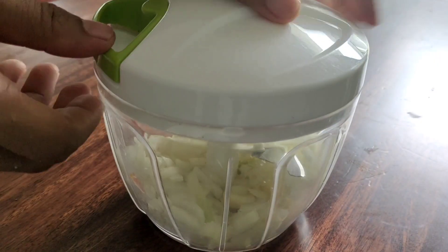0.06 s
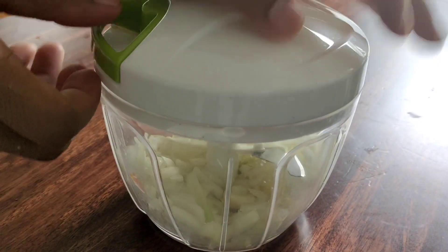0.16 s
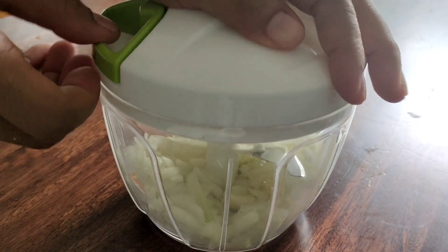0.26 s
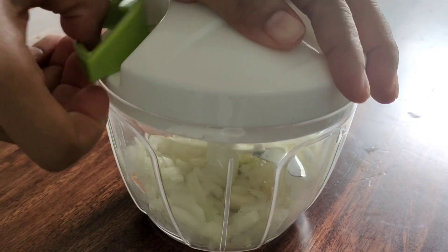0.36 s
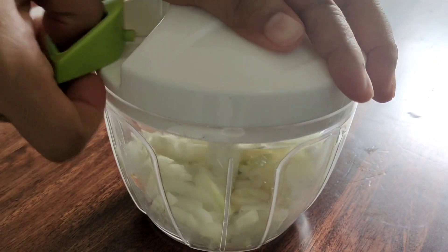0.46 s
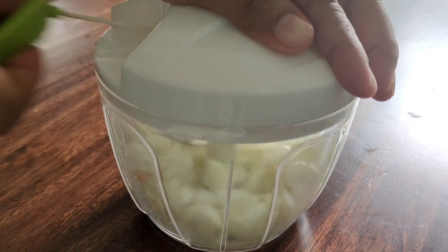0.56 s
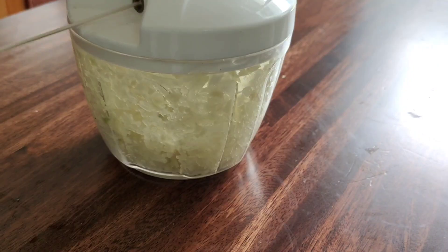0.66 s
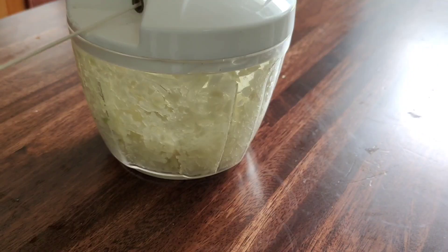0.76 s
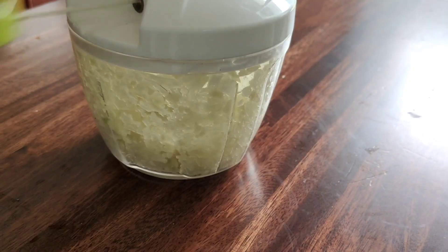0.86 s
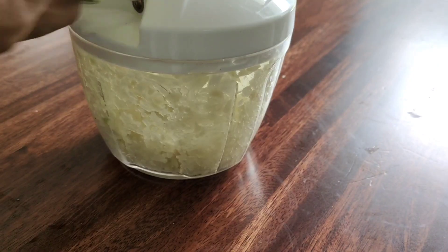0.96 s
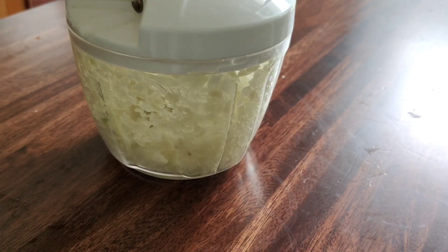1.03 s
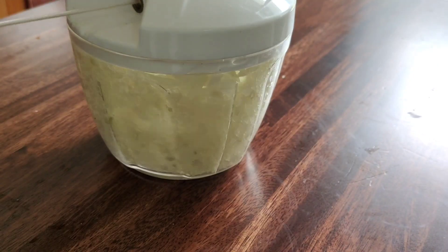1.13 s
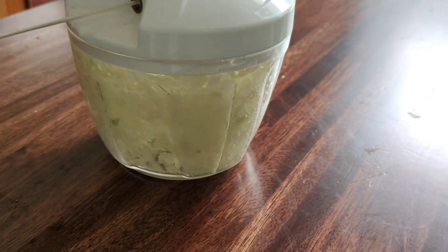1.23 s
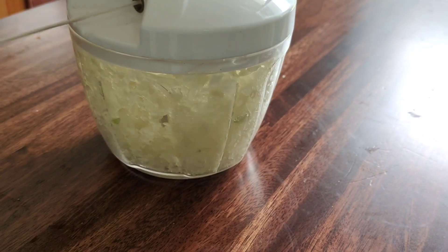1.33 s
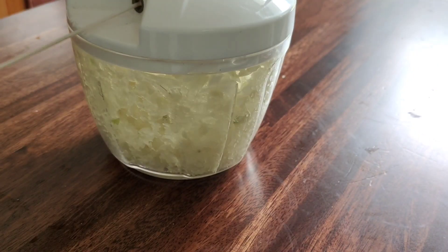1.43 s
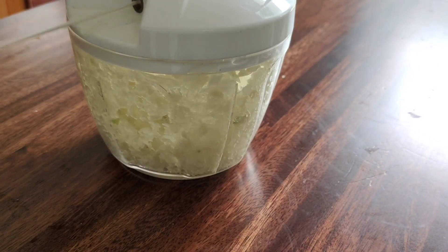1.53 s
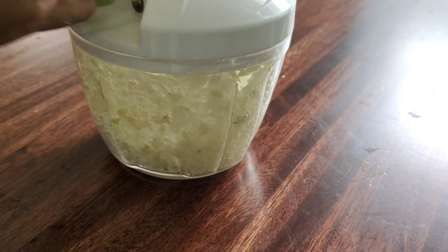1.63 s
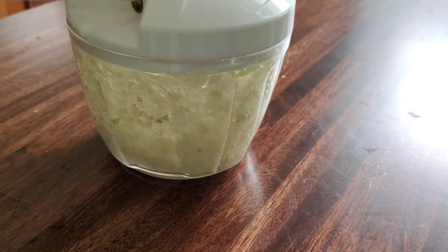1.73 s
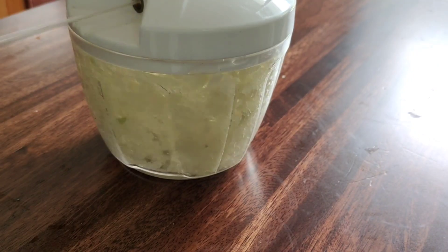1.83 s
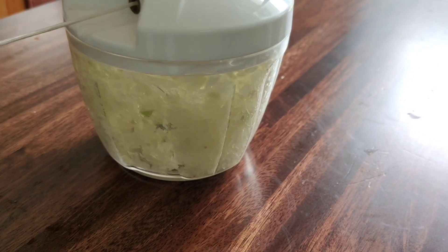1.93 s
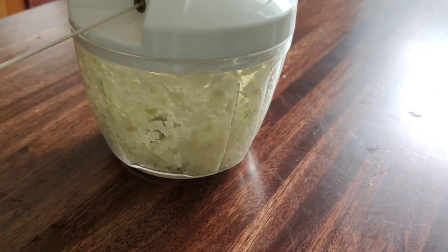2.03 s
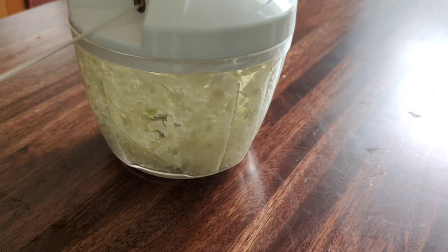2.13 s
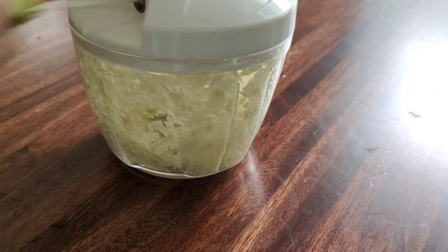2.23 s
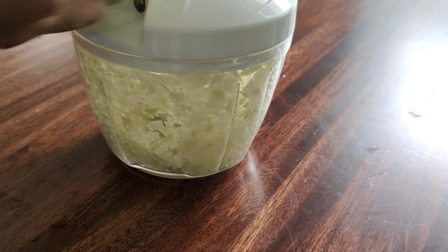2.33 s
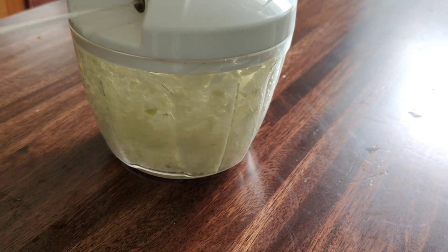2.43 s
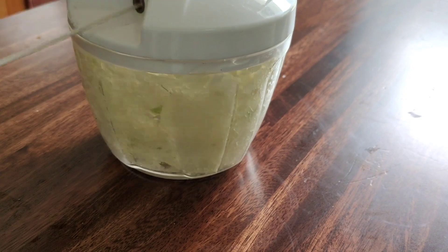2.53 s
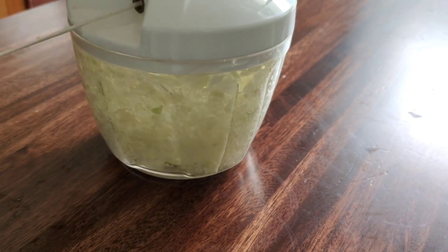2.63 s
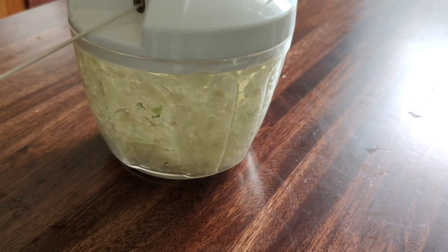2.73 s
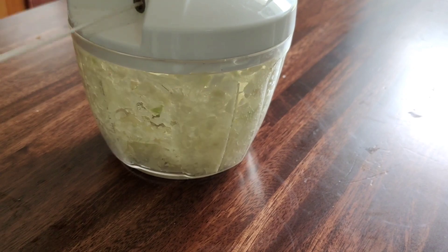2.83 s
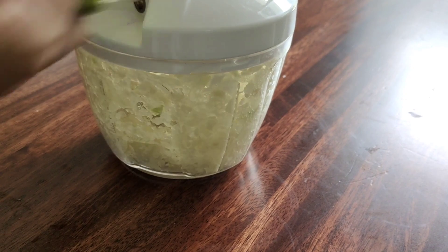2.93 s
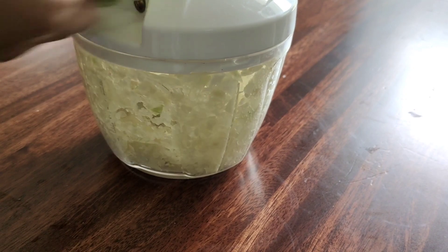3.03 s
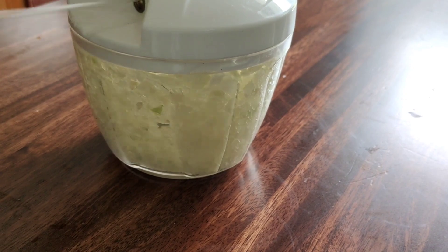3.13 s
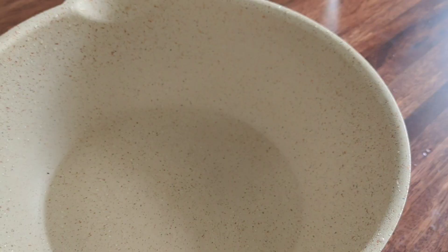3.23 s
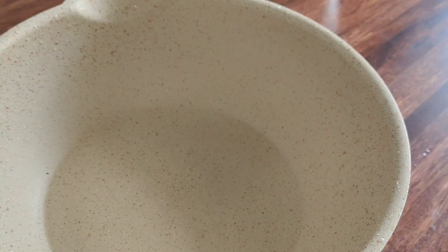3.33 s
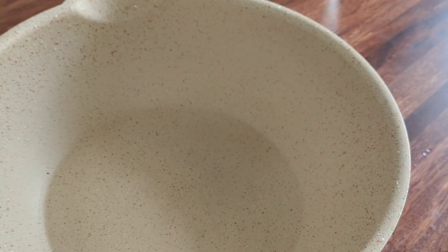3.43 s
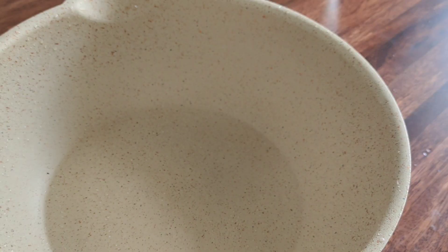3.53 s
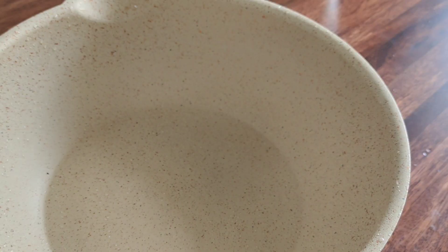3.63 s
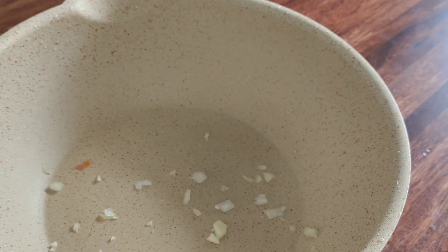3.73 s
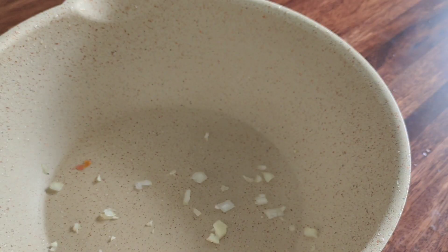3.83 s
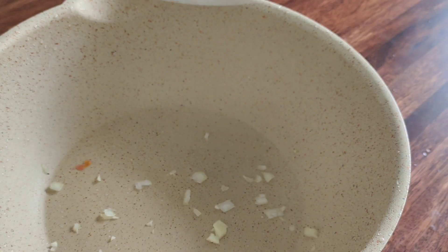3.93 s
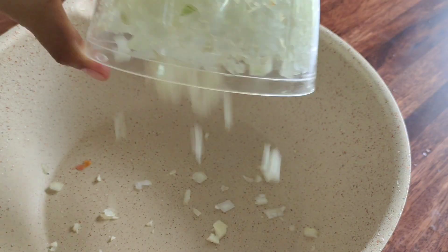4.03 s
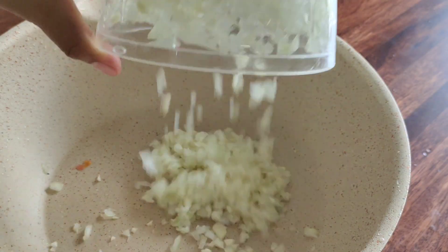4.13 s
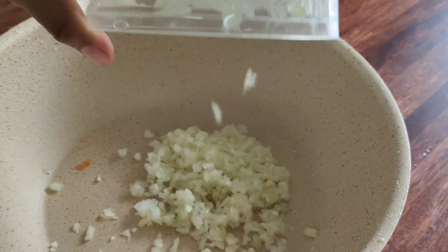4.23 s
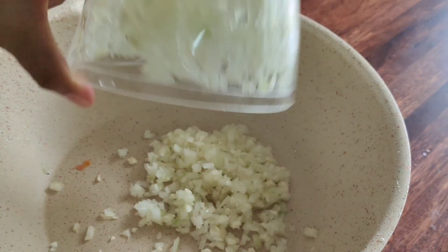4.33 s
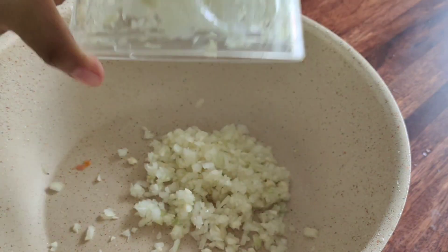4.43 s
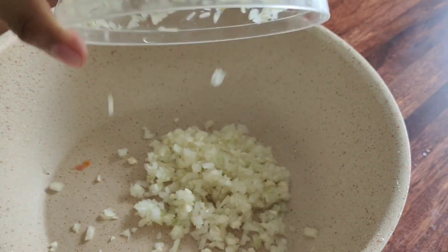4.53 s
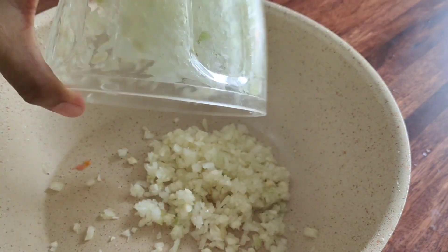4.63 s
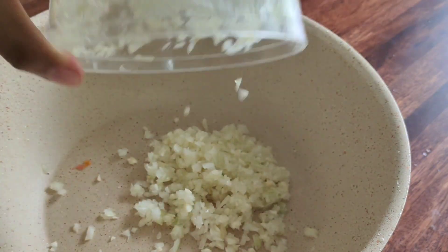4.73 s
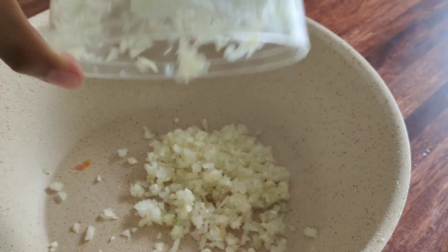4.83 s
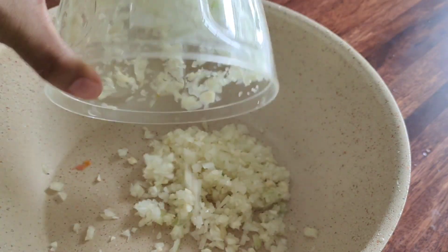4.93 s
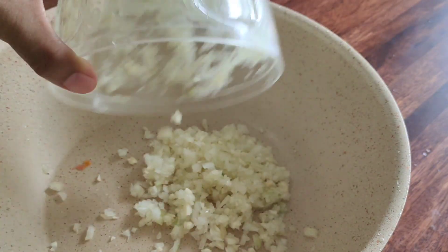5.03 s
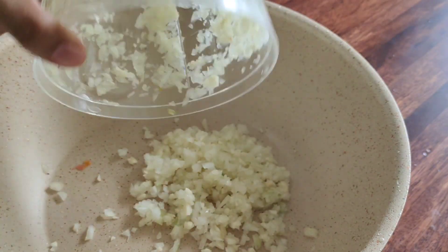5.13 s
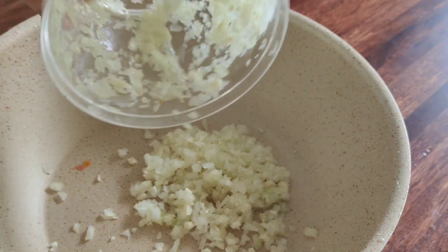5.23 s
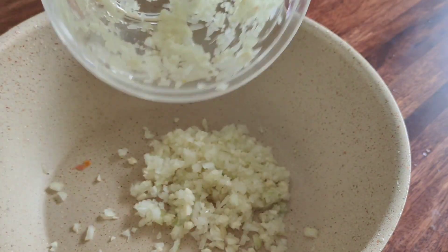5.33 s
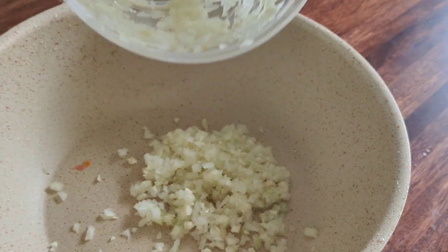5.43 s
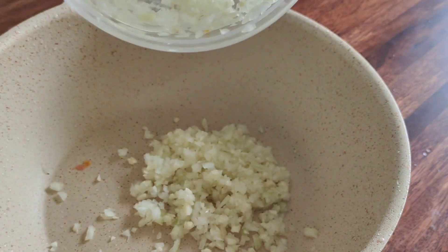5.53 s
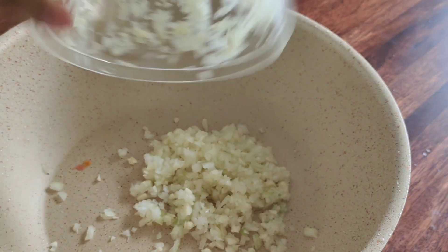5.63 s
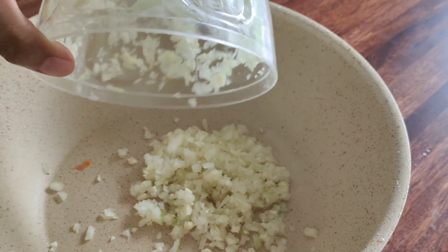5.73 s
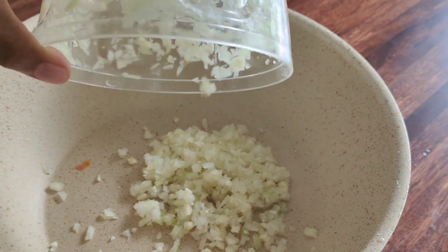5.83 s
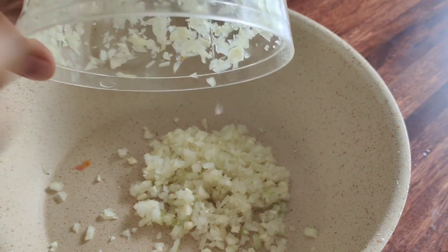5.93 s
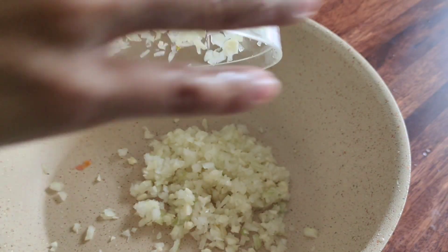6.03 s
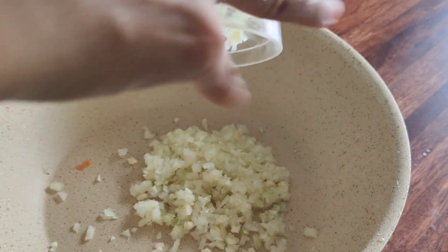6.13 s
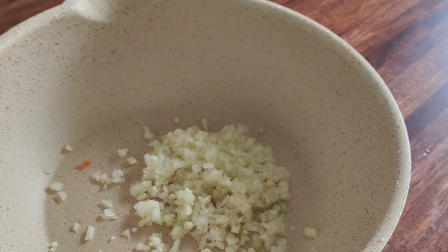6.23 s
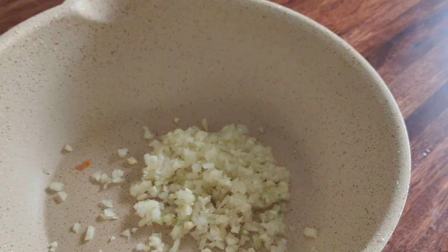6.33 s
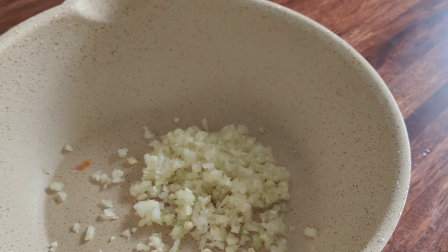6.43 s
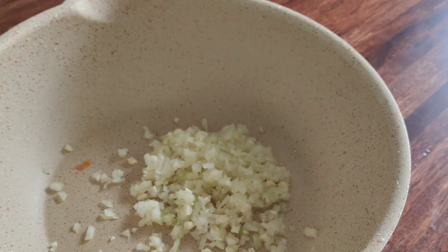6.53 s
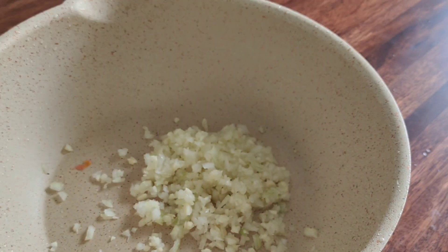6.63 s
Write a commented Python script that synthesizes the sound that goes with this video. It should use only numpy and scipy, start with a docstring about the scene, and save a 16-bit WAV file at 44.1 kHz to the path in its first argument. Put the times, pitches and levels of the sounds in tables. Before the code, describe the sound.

A close stereo pickup in a small, lightly echoing room with faint air noise and a low appliance hum. Slight rubbing of hands and small clicks lead to the first chopper pull at about 0.6 s: a loud, clumpy clatter of onion hitting plastic with hard hollow knocks. More pulls follow near 1.1, 1.8, 2.45 and 3.2 s, each dying into a dry rasping spring whirr of very fine ticks, strongest after the middle three, with snaps around 1.04, 1.66, 2.33 and 3.05 s. The last pull adds a low wavering judder against the table from 2.9 s. Everything cuts short near 3.46 s. A sharp rap at 3.6 s and crumbs pattering until 3.85 s follow, then a softer spill at 4.1 s. Dull pats and scuffs come near 4.5, 6.0 and 6.4 s, with sparse faint taps between. At 6.1 s the pan gives one hard tick and brief ring.

```python
"""Pull-cord onion chopper

Five pulls throw onion against the blades and the plastic tub on a wooden table in a small room: clumped grains
through tub resonances. After each, the spring reels the cord in with a rasping whirr of very fine ticks.
The chopping is cut short, then the tub is knocked and patted empty over a coated pan, which it touches once:
noise bursts through short rings, dull decaying booms and a bank of dying sines. Air noise and a hum lie behind."""
import sys
import numpy as np
from scipy import signal
from scipy.fft import rfft, irfft
from scipy.io import wavfile
from scipy.ndimage import uniform_filter1d

SR = 44100
rng = np.random.default_rng(int(sys.argv[2]) if len(sys.argv) > 2 else 0)


def to_wav(s):
    """Save 16-bit WAV."""
    ch = np.atleast_2d(s).T  # columns
    pcm = np.round(np.clip(ch, -1, 1) * 32767)  # PCM
    wavfile.write(sys.argv[1], SR, pcm.astype(np.int16))


N = 294588
T = np.arange(N) / SR


def from_db(db):
    """Decibels to gain."""
    return 10 ** (np.asarray(db) / 20)


def at_hz(points, hz):
    """Read a curve on a log-frequency axis."""
    f, value = np.transpose(points)
    return np.interp(np.log(np.maximum(hz, 1)), np.log(f), value)


def convolve(x, response):
    """Causal convolution of every channel."""
    full = signal.fftconvolve(np.atleast_2d(x), np.atleast_2d(response), axes=-1)
    return full[:, :np.shape(x)[-1]]


def colour(x, points, tilt_db=0, size=4096):
    """Minimum-phase EQ through the points, tilted per octave about 1.5 kHz (the tilt is flat below 300 Hz)."""
    hz = np.maximum(np.fft.rfftfreq(size, 1 / SR), 10)
    level_db = at_hz(points, hz) + tilt_db * np.log2(np.maximum(hz, 300) / 1500)
    cepstrum = irfft(np.log(from_db(level_db)))
    # folding the cepstrum on to positive time makes the filter minimum-phase
    cepstrum[1:size // 2] *= 2
    cepstrum[size // 2 + 1:] = 0
    return convolve(x, irfft(np.exp(rfft(cepstrum))))


def resonate(x, modes):
    """Parallel resonances, each (f/Hz, width/Hz, level/dB)."""
    out = 0
    for hz, width_hz, db in modes:
        b, a = signal.iirpeak(hz, hz / width_hz, SR)
        out = out + from_db(db) * signal.lfilter(b, a, x + 1e-18)
    return out


def band_pass(x, band_hz):
    """Second-order Butterworth band-pass."""
    return signal.sosfilt(signal.butter(2, band_hz, "band", fs=SR, output="sos"), x)


def unit_in(x, band_hz):
    """Scale to rms 1 within a band."""
    return x / np.sqrt(np.mean(band_pass(x, band_hz) ** 2))


def grains(per_s, spread_db):
    """Random tiny impacts of uneven size; rms 1."""
    sizes = from_db(spread_db * np.minimum(rng.exponential(1, N), 4)) * rng.choice([-1, 1], N)
    clicks = sizes * (rng.random(N) < per_s / SR)
    return clicks / np.std(clicks)


def wander(per_s):
    """Straight lines between random knots whose spread is 1."""
    knots = np.arange(0, N / SR + 1, 1 / per_s)
    return np.interp(T, knots, rng.standard_normal(size=4096)[:len(knots)])


def lumps(per_s, depth_db):
    """A gain that swells and sinks at random."""
    return from_db(depth_db * wander(per_s))


def swell(s, hold_s, db, rise_db_per_s, fall_db_per_s):
    """Gain that rises to its level at a time, holds and dies away, all in straight dB ramps."""
    below_db = rise_db_per_s * np.maximum(s - T, 0) + fall_db_per_s * np.maximum(T - s - hold_s, 0)
    return from_db(db - np.minimum(below_db, 200))


def swells(rows):
    """Sum of the swells in a table."""
    return sum(swell(*row) for row in rows)


def rustle(points, per_s, spread_db):
    """Fine grains of rubbing or pattering, rms 1 in the mids."""
    return unit_in(colour(grains(per_s, spread_db), points), (600, 8000))


def add(track, s, sound):
    """Mix a short sound in at a time."""
    start = round(s * SR)
    track[start:start + len(sound)] += sound[:N - start]


def to_peak(x, db):
    """Scale a blow to its peak level."""
    return from_db(db) * np.ravel(x) / np.abs(x).max()


def contact(crush_s, grit, size=4096):
    """One sharp push followed by a short burst of crushing."""
    burst = grit * rng.standard_normal(size) * np.exp(-T[:size] / crush_s)
    burst[0] += 1
    return burst


def blows(rows, points, crush_s, grit, ring_db, damping):
    """Each contact rings briefly at a pitch set by where it lands; damping is ring width over pitch."""
    buildup_s = .0015  # every contact starts this long after its listed time
    out = np.zeros(N)
    for s, peak_db, hz, tilt_db in rows:
        push = contact(crush_s, grit)
        push = push + resonate(push, [(hz, hz * damping, ring_db)])
        add(out, s + buildup_s, to_peak(colour(push, points, tilt_db), peak_db))
    return out


# tone of the room's echoes against the direct sound: (f/Hz, level/dB)
ROOM_ECHO_COLOUR = [(120, -23), (350, -10.5), (1000, -4), (3000, -2), (12000, -5.5)]
ROOM_T60_S = 0.21
RIGHT_LEAD_S = 0.00012


def room(dry, lead_s, echo_db=0, size=22050):
    """Direct sound reaches the right port first; a quick scatter off table and hands follows, then the walls."""
    t = T[:size]
    walls = from_db(-60 * t / ROOM_T60_S) * (1 - np.exp(-t / 0.0092))
    nearby = np.exp(-t / 0.0017) * (t > .0003)
    decay = walls / np.linalg.norm(walls) + from_db(1.0) * nearby / np.linalg.norm(nearby)
    echoes = colour(rng.standard_normal((2, size)) * decay, ROOM_ECHO_COLOUR)
    # windowed sinc: a delay of a fraction of a sample
    lag = np.sinc(np.arange(32) - 8 - lead_s * SR) * signal.windows.tukey(32, .3)
    left = np.convolve(dry, lag)[8:8 + N]
    return np.array([left, dry]) + from_db(echo_db) * convolve(dry, echoes)


# spectrum of the room air: (f/Hz, level/dB per Hz)
AIR_COLOUR = [(15, -77.5), (25, -58), (69, -31), (91, -12), (122, -13.5), (198, -10.5), (267, -14.5),
              (297, -9.5), (368, -15.5), (482, -13), (648, -23.5), (1660, -32), (1950, -31), (3340, -36),
              (15500, -46.5)]
# steady tones of the appliance: (f/Hz, rms level/dB)
APPLIANCE_HUM = [(102.3, -76), (199.2, -71.5), (301.5, -63.5), (484.5, -69), (565.2, -82), (1900, -84),
                 (2239, -85), (2385, -89.5)]
AIR_DB = -67.5


def background():
    """Room air as noise, nearly alike in both ears in the bass, and an appliance's hum as steady sines."""
    mid = rng.standard_normal(N)
    side = colour(rng.standard_normal(N), [(100, -14), (400, -1.0), (1500, 1.5), (8000, 1.0)])
    air = colour(mid + side * [[1], [-1]], AIR_COLOUR)
    hum = 0
    for hz, db in APPLIANCE_HUM:
        hum = hum + np.sqrt(2) * from_db(db) * np.sin(2 * np.pi * (hz * T + rng.random()))
    return from_db(AIR_DB) * unit_in(air, (600, 8000)) + hum


# hands and slack cord rub on the lid: (firmest t/s, hold/s, level/dB, rise/dB per s, fall/dB per s)
HANDLING = [(0.35, 0.25, -56.5, 34, 600)]
# spectrum of the rubbing: (f/Hz, level/dB per Hz)
RUB_COLOUR = [(47, -44), (80, -22.5), (166, 6.5), (350, -10.5), (477, -1), (621, -10), (2040, -18),
              (2720, -18.5), (8930, -27), (15500, -34)]


def rubbing():
    """Skin and cord drag over the lid in a dense run of tiny grains."""
    return swells(HANDLING) * rustle(RUB_COLOUR, per_s=2300, spread_db=3.0)


# the largest pieces of onion knock in the tub: (t/s, peak level/dB, ring f/Hz, brightness/dB per octave)
ONION_KNOCKS = [(0.155, -36, 2400, -2.5), (0.282, -25.5, 1960, -2.5), (0.529, -20, 696, -2),
                (0.546, -28, 1392, -6.5), (0.569, -9, 2177, -3.5), (0.591, -13, 1964, 0),
                (0.626, -11, 1390, -3.5), (0.649, -5, 2230, -1), (0.689, -1, 704, 1.5),
                (0.725, -1.5, 2253, -0.5), (0.763, -11, 810, -1.5), (0.987, -13, 869, -2.5),
                (1.08, -9, 867, 1.5), (1.117, -4.5, 793.4, -0.5), (1.146, -17.5, 923, -3),
                (1.197, -2.5, 746, 0.5), (1.221, -10.5, 915, 4), (1.257, -16.5, 1274, -1),
                (1.749, -4.5, 822, -2), (1.805, -3, 704, -2), (1.848, -1, 845, 0.5),
                (2.272, -20.5, 859, -5), (2.406, -11, 708.5, -2), (2.438, -5.5, 810, -1.5),
                (2.513, -3.5, 770, 0.5), (2.644, -13, 950, -2.5), (2.69, -17.5, 1970, -5.5),
                (2.823, -10, 752, 5), (3.215, -6.5, 748, -1), (3.236, -3, 785, 0.5)]
# spectrum of a knock before its ring and brightness: (f/Hz, level/dB per Hz)
KNOCK_COLOUR = [(50, -38), (130, -12.5), (250, -2), (550, -6), (800, 1), (1400, -4), (2800, -1.5),
                (5000, -7), (10000, -14.5), (15500, -34.5)]


def knocking():
    """Heavy pieces strike the plastic: heavily damped, slightly gritty contacts."""
    return blows(ONION_KNOCKS, KNOCK_COLOUR, crush_s=0.0021, grit=0.14, ring_db=4.0, damping=0.59)


# soft pats and bumps of the tub: (t/s, peak level/dB, ring f/Hz)
TUB_PATS = [(0.17, -42, 158), (4.108, -44, 150), (4.518, -46.5, 173), (4.56, -50, 290), (5.97, -46, 170),
            (6.012, -46, 281), (6.411, -45, 288), (6.459, -60, 303)]


def patting(swell_s=0.008, size=8192):
    """Flesh on plastic: a dull boom that swells and dies in a few cycles."""
    out, t = np.zeros(N), T[:size]
    for s, peak_db, hz in TUB_PATS:
        boom = t * np.exp(-t / swell_s) * np.sin(2 * np.pi * hz * t)
        add(out, s, to_peak(boom, peak_db))
    return out


# handle and cord ratchet snap home: (t/s, peak level/dB, ring f/Hz, brightness/dB per octave)
RATCHET_SNAPS = [(0.1972, -18, 755, -1), (0.359, -21.5, 737, 0), (0.3755, -27, 1346, -4.5),
                 (1.037, -15.5, 1997, -1.5), (1.047, -18.5, 741, -4), (1.659, -16.5, 921, -3.5),
                 (2.3345, -17.5, 833, 0), (3.045, -14.5, 815, 1.5)]
# spectrum of a snap before its ring and brightness: (f/Hz, level/dB per Hz)
SNAP_COLOUR = [(80, -24), (300, 0.5), (800, 0), (1400, -5), (2500, -1), (4500, -6.5), (10000, -7.5),
               (15500, -18.5)]


def snapping():
    """Hard parts snap home: longer, grittier contacts that ring more freely than the knocks."""
    return blows(RATCHET_SNAPS, SNAP_COLOUR, crush_s=0.0033, grit=.45, ring_db=2.0, damping=0.32)


REWIND_SKEW, RASP_POWER = 0.61, 1.86  # the spool is fastest early in its run; gain is a power of its speed


def spool_run(s, length_s):
    """Gain over one rewind: the spring snaps the spool up to speed, then slackens."""
    progress = np.clip((T - s) / length_s, 0, 1)
    return np.abs(np.sin(np.pi * progress ** REWIND_SKEW)) ** RASP_POWER


# the cord is pulled; the blades spin up, cut and slow: (full speed t/s, hold/s, level/dB, rise/dB per s,
# fall/dB per s, impacts per s on one spot, brightness/dB per octave)
CORD_PULLS = [(0.651, 0.14, -27.5, 146, 275.5, 336, 0.65), (1.145, 0.088, -26.5, 135, 213, 328, 0.25),
              (1.80, 0.083, -23.5, 159.5, 179.5, 470, -0.1), (2.458, .11, -24, 186.5, 278, 495, 0),
              (3.19, 0.067, -24, 113, 188.5, 580, -0.03)]
# the spring reels the cord in: (start t/s, length/s, rasp level/dB, tumbling onion level/dB)
CORD_REWINDS = [(0.859, 0.1, -43, -42), (1.315, 0.37, -31.5, -38.5), (1.981, .36, -30.5, -36.5),
                (2.663, .38, -32, -35), (3.369, 0.13, -40, -41)]
# resonances of tub and lid: (f/Hz, width/Hz, level over the broad colour/dB)
TUB_MODES = [(158, 15, 6), (372, 31, -1), (670, 25, -4.5), (790, 30, -5), (1010, 57, -15.5),
             (1450, 84, -2.5), (2260, 400, -6.5), (3700, 1100, -9.5)]
# broad spectrum of the chopping: (f/Hz, level/dB per Hz)
CHOP_COLOUR = [(35, -62.5), (60, -36.5), (156, -6), (291, 2), (327, -2.5), (359, -1.5), (403, -2),
               (673, -0.5), (1740, -10), (2200, -7.5), (2650, -14), (3500, -15), (8090, -23), (9300, -17.5),
               (15500, -40)]


def chopping():
    """Blades fling pieces at the wall in clumps; the onion tumbles on through the rewind."""
    out = 0
    for pull, rewind in zip(CORD_PULLS, CORD_REWINDS):
        *stroke, per_s, tilt_db = pull
        s, length_s, _, tumble_db = rewind
        hits = grains(per_s, spread_db=2.5) * lumps(per_s=60, depth_db=2.5)
        tub = colour(hits + resonate(hits, TUB_MODES), CHOP_COLOUR, tilt_db)
        gain = swell(*stroke) + from_db(tumble_db) * spool_run(s, length_s)
        out = out + unit_in(tub, (600, 2500)) * gain
    return out


# resonances of cord spool and spring housing: (f/Hz, width/Hz, level over the broad colour/dB)
SPOOL_MODES = [(686, 23, -4.5), (1936, 37, -3), (4270, 120, -5), (6080, 87, 5), (7070, 150, 7),
               (8900, 500, -15)]
# broad spectrum of the rewind before a slight tilt: (f/Hz, level/dB per Hz)
REWIND_COLOUR = [(35, -67.5), (60, -42.5), (145, -10.5), (305, -2.5), (572, -9.5), (657, -0.5), (738, -7),
                 (976, -6), (1520, -11), (1910, -9.5), (3420, -17.5), (7030, -17), (8090, -19), (9080, -11),
                 (15500, -29.5)]


def rewinding():
    """The coil spring and cord rasp through the housing in very fine ticks."""
    ticks = grains(per_s=2200, spread_db=4.5)
    housing = colour(ticks + resonate(ticks, SPOOL_MODES), REWIND_COLOUR, tilt_db=-0.23)
    gain = sum(from_db(rasp_db) * spool_run(s, length_s) for s, length_s, rasp_db, _ in CORD_REWINDS)
    return unit_in(housing, (6000, 12000)) * gain


# the tub judders on the table: (full swing t/s, hold/s, level/dB, rise/dB per s, fall/dB per s)
JUDDER = [(2.91, 0.32, -24.5, 151, 103.5)]
# resonances of the tub rocking on the table: (f/Hz, width/Hz, level/dB)
TABLE_MODES = [(138, 3.4, -14.5), (183, 9.1, -8), (267, 27, -3), (300, 35, -8), (365.5, 34, -6.5)]
# stick and slip lock on to one mode: pitch, level against the drone, waver as a share of pitch
GROAN_HZ, GROAN_DB, GROAN_WAVER = 275, -4, 0.043


def juddering():
    """The base sticks and slips on the table: a wavering groan over a drone of its low modes."""
    drone = band_pass(resonate(grains(per_s=450, spread_db=-2.0), TABLE_MODES), [120, 520])
    drone /= np.sqrt(uniform_filter1d(drone ** 2, size=2205) + 1e-12)  # friction holds the swing steady
    slip_hz = GROAN_HZ * (1 + GROAN_WAVER * wander(per_s=40))
    tone = np.sqrt(2) * np.sin(2 * np.pi * np.cumsum(slip_hz) / SR)
    groan = tone * lumps(per_s=35, depth_db=4.0)
    return (unit_in(drone, (200, 420)) + from_db(GROAN_DB) * groan) * swells(JUDDER)


# the tub is rapped, wet crumbs land in the pan: (t/s, peak level/dB, ring f/Hz, brightness/dB per octave)
TUB_TAPS = [(3.621, -8, 2730, 0), (3.649, -32, 1720, -1), (3.744, -24.5, 2250, 0.5),
            (3.787, -26, 1970, 5.5), (3.804, -20.5, 1560, 3.5), (3.825, -32, 1560, 9),
            (4.059, -42, 1280, -3), (4.086, -26.5, 1850, 0), (4.1, -25.5, 1284, 4),
            (4.435, -47.5, 1280, -4), (4.469, -44, 1190, 2.5), (4.591, -42, 1288, -4),
            (4.728, -48.5, 1900, 6), (5.161, -43, 2300, 7), (5.279, -49, 2190, 3)]
# spectrum of a tap before its ring and brightness: (f/Hz, level/dB per Hz)
TAP_COLOUR = [(100, -49), (350, -1), (600, -8), (1000, 0), (2200, -5.5), (3200, -7), (4500, -8.5),
              (7000, -14.5), (10000, -24), (15500, -44)]


def tapping():
    """Raps and wet crumbs: contacts with little grit and a strong, damped ring."""
    return blows(TUB_TAPS, TAP_COLOUR, crush_s=0.0026, grit=0.062, ring_db=6, damping=0.4)


# chopped onion slides out and lands: (thickest t/s, hold/s, level/dB, rise/dB per s, fall/dB per s)
ONION_SPILLS = [(3.64, .01, -50, 900, 87), (3.803, .008, -44.5, 237, 520), (4.091, 0.0084, -48, 747, 170),
                (5.158, .005, -74, 247, 150)]
# spectrum of the spill: (f/Hz, level/dB per Hz)
SPILL_COLOUR = [(120, -42), (200, 3), (227, -34), (293, -2), (454, -6), (890, 1.5), (1230, -6.5),
                (3300, -11.5), (4920, -19), (6960, -17.5), (15500, -32)]


def spilling():
    """Chopped onion patters down as dense grains of very uneven size."""
    return swells(ONION_SPILLS) * rustle(SPILL_COLOUR, per_s=2200, spread_db=5.0)


# the palm scuffs the tub: (t/s, level/dB)
PALM_SCUFFS = [(4.518, -62), (5.97, -63.5), (6.405, -62.5)]
# spectrum of a scuff: (f/Hz, level/dB per Hz)
SCUFF_COLOUR = [(100, -20), (200, 8), (750, 1.5), (1100, -10), (2500, -17.5), (6000, -26.5), (15500, -30)]


def scuffing():
    """Skin drags briefly on plastic: fine grains, quick in and slower out."""
    palm = sum(swell(s, hold_s=0.028, db=db, rise_db_per_s=1000, fall_db_per_s=100) for s, db in PALM_SCUFFS)
    return palm * rustle(SCUFF_COLOUR, per_s=2500, spread_db=2.5)


# the tub touches the pan: (t/s, tick peak level/dB)
PAN_CLINK = [(6.125, -18.5)]
# ringing modes of the pan: (f/Hz, level against the tick's peak/dB, t60/s)
PAN_MODES = [(938, -24.5, 0.14), (1970, -37, .14), (2220, -33.5, 0.4), (2379, -38.5, 0.36),
             (2900, -44.5, .16), (3435, -39, .26), (3500, -41, .27), (3650, -43, .17), (5529, -43, .14)]
# spectrum of the tick and the wash: (f/Hz, level/dB per Hz)
CLINK_COLOUR = [(60, -53.5), (500, -24), (720, -13), (950, 1.5), (1500, -12.5), (2350, 4), (2850, -7),
                (3600, -0.5), (5500, -11), (9300, -16), (15500, -25)]
PAN_WASH_DB, PAN_WASH_T60_S = -37.5, 0.71  # its many weak modes blur into one dying wash


def clinking(size=32768):
    """A hard tick, and the pan rings on."""
    out, t = np.zeros(N), T[:size]
    ring = sum(from_db(db - 60 * t / t60) * np.sin(2 * np.pi * hz * t) for hz, db, t60 in PAN_MODES)
    wash = np.ravel(colour(rng.standard_normal(size), CLINK_COLOUR))
    ring = ring + wash / np.std(wash) * from_db(PAN_WASH_DB - 60 * t / PAN_WASH_T60_S)
    for s, peak_db in PAN_CLINK:
        tick = colour(contact(crush_s=0.0012, grit=0.038), CLINK_COLOUR)
        add(out, s, to_peak(tick, peak_db))
        add(out, s, from_db(peak_db) * ring)
    return out


# spots round the tub wall: (lead of the right port t/s)
WALL_LEADS_S = [.00005, 0.00011, 0.00015]


def chopper():
    """The working chopper in the room; its whirr comes from several spots round the tub wall."""
    spots = [room(np.ravel(chopping() + rewinding()), lead_s) for lead_s in WALL_LEADS_S]
    whirr = sum(spots) / np.sqrt(len(WALL_LEADS_S))
    base = room(np.ravel(juddering() + rubbing()), RIGHT_LEAD_S, echo_db=-3)
    knocks = room(knocking(), RIGHT_LEAD_S, echo_db=1.0)
    snaps = room(snapping(), RIGHT_LEAD_S, echo_db=-1.5)
    return whirr + base + knocks + snaps


def tub_and_pan():
    """Taps, falling onion and scuffs near the centre; pats and the pan further to the right."""
    emptying = room(np.ravel(tapping() + spilling() + scuffing()), lead_s=.00006)
    return emptying + room(patting() + clinking(), RIGHT_LEAD_S)


CHOPPER_END_S, CHOPPER_FADE_S = 3.462, 0.029  # middle and length of the fade


def scene():
    """The chopper, faded out abruptly, with the tub and pan and the background left running."""
    chopper_gain = np.clip((CHOPPER_END_S - T) / CHOPPER_FADE_S + .5, 0, 1)
    return chopper() * chopper_gain + tub_and_pan() + background()


# treble balance of the two microphone ports: (f/Hz, left minus right level/dB)
PORT_BALANCE = [(500, 0), (3400, -1.5), (4600, -3), (5600, -1.5), (7100, -11), (8000, -0.5), (8900, 10.5),
                (9900, 7.5), (11200, 4), (12300, -7), (13500, -7), (15500, -17)]
CUTOFF_HZ = 15600


def record(dry):
    """Each port colours the treble in its own way; the highest peaks are rounded and the top is cut."""
    ports = []
    for channel, sign in zip(dry, (1, -1)):
        ports.append(colour(channel, [(hz, sign * db / 2) for hz, db in PORT_BALANCE]))
    rounded = .85 * np.tanh(np.vstack(ports) / .85)
    return signal.sosfilt(signal.ellip(10, .1, 80, CUTOFF_HZ, fs=SR, output="sos"), rounded)


dry = scene()
out = record(dry)
to_wav(out)
```